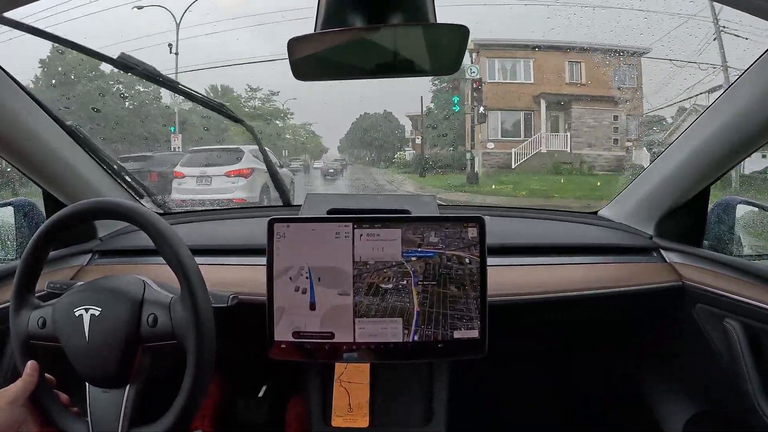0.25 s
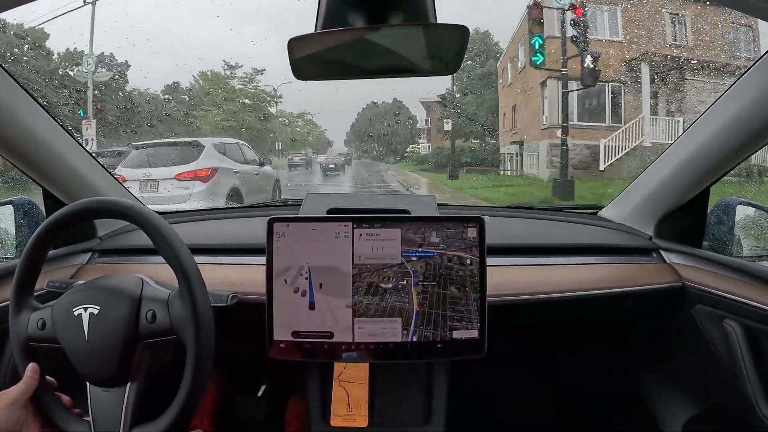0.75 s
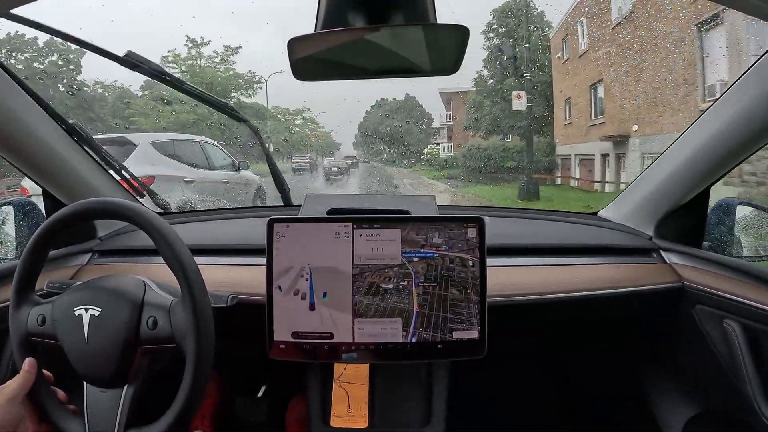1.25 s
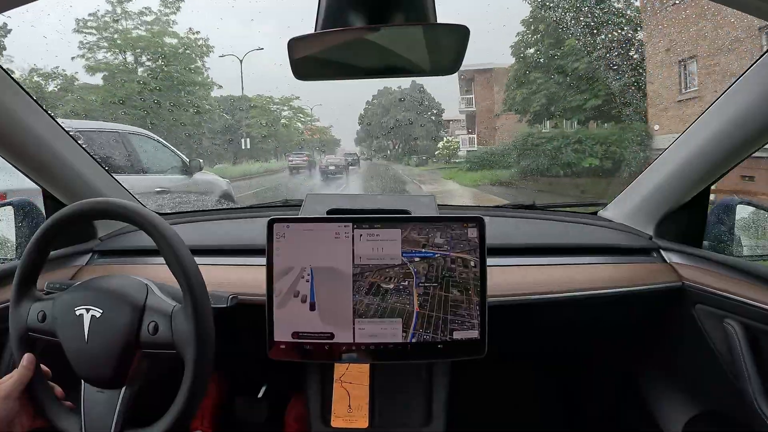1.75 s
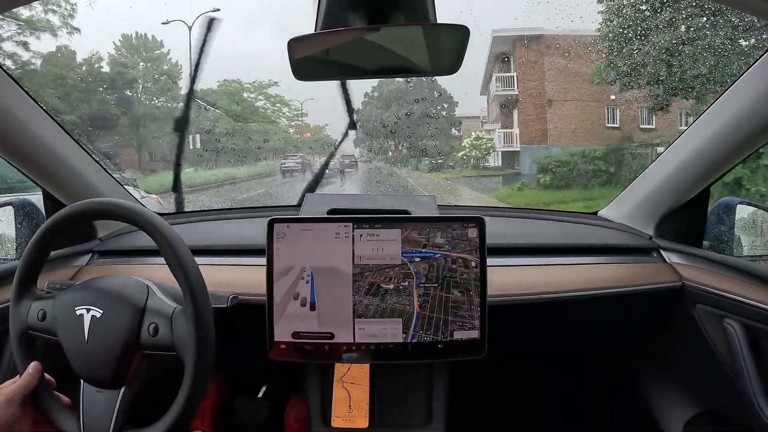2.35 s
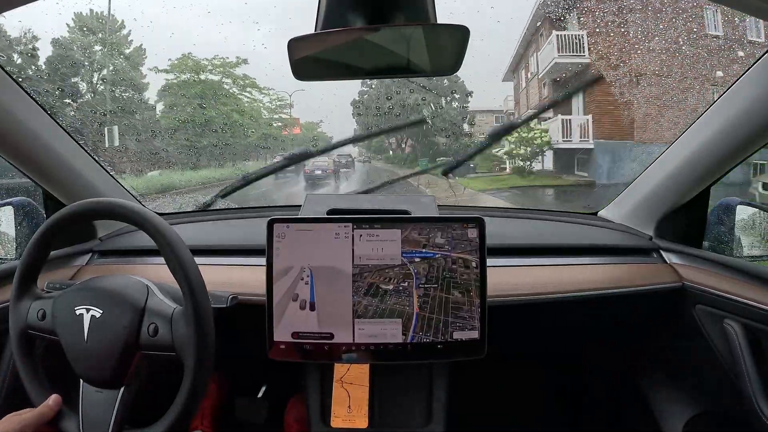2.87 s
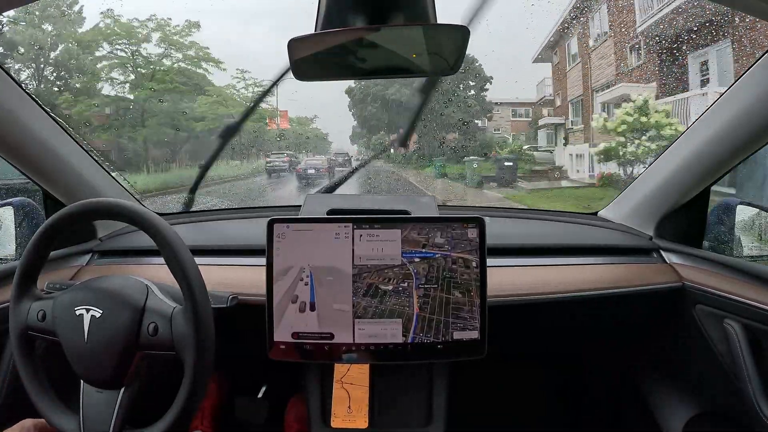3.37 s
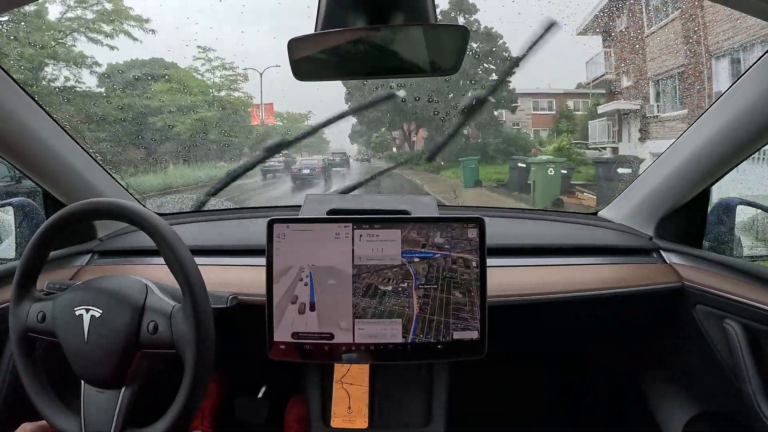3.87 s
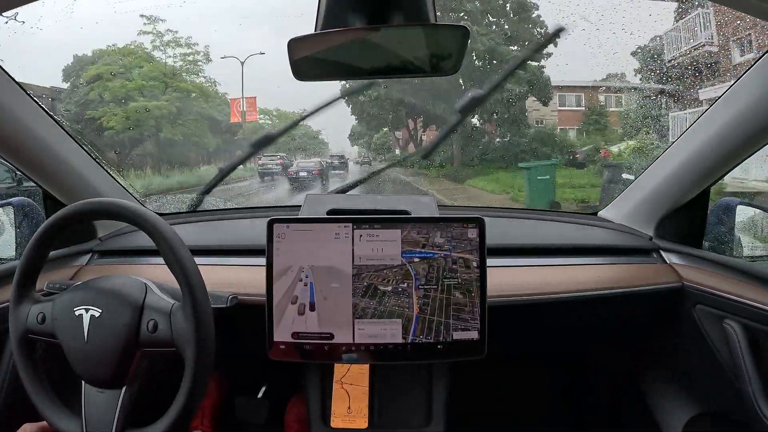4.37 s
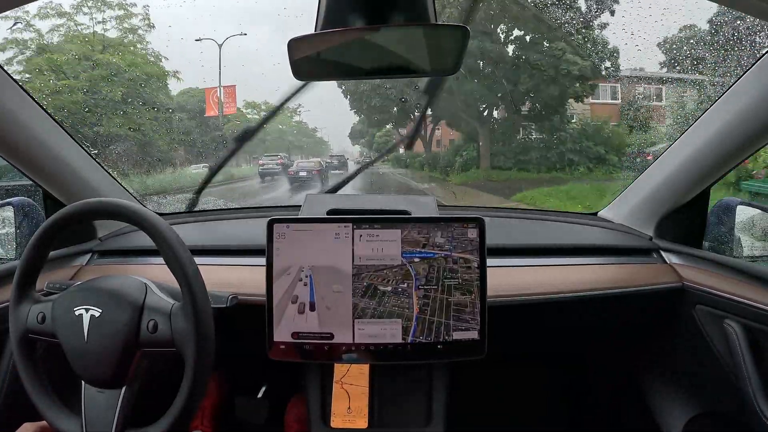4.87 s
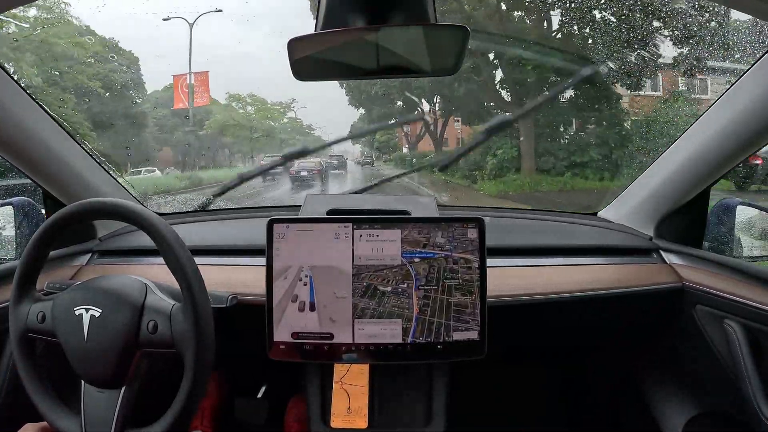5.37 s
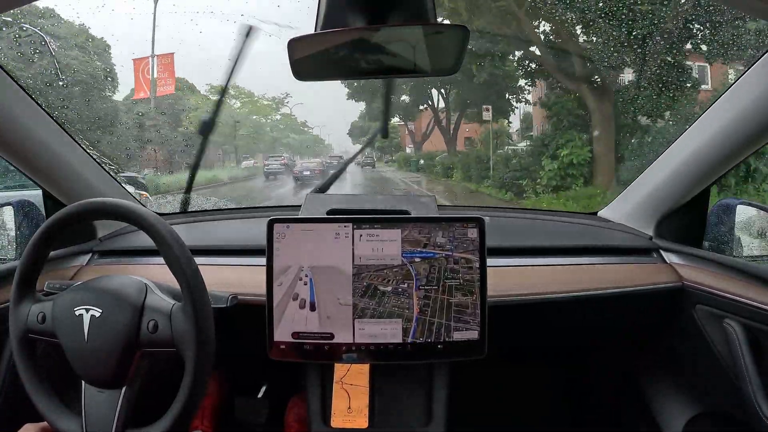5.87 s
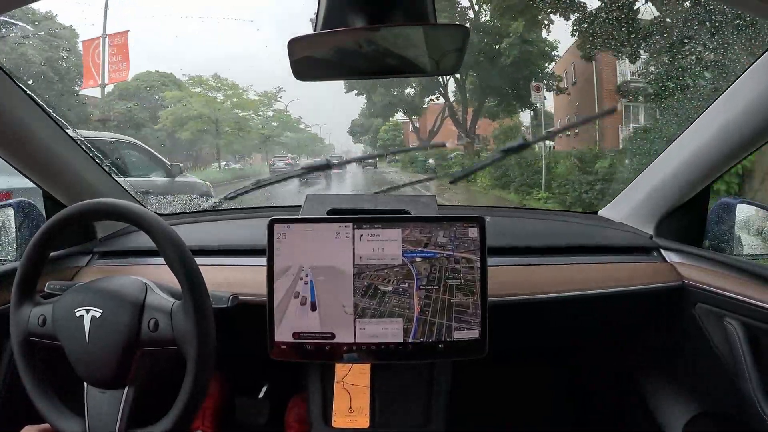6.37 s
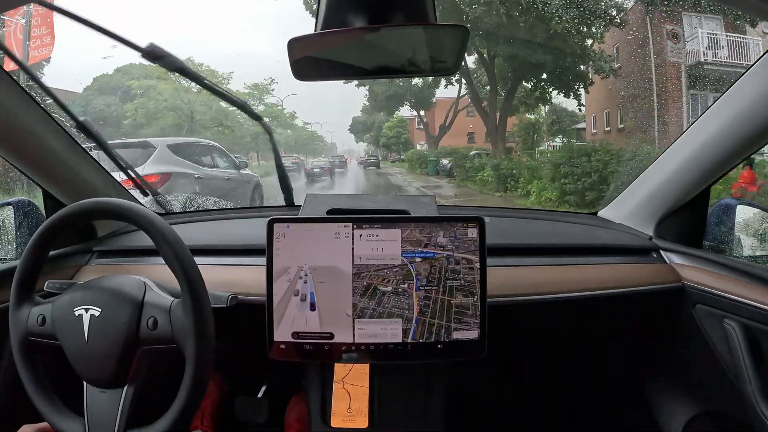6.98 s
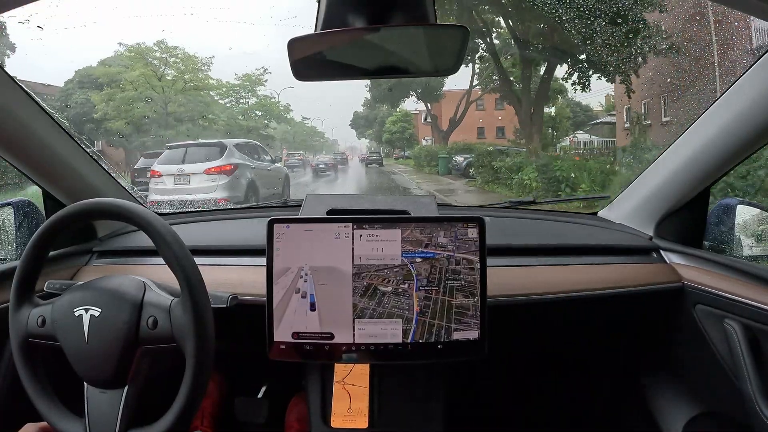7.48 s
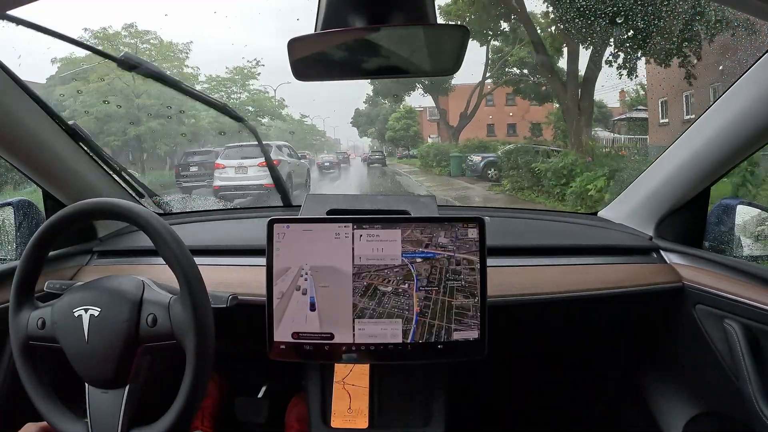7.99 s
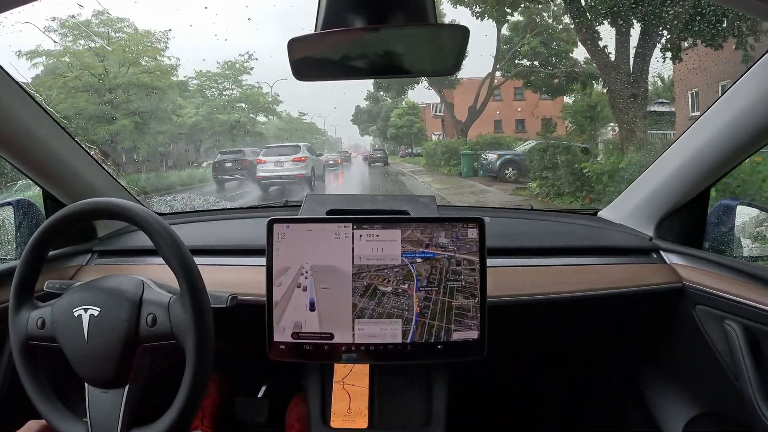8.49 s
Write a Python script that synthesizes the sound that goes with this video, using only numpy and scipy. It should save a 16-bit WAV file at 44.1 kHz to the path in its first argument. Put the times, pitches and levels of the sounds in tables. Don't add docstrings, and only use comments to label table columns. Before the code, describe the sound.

Heard from between the front seats of a car in a downpour. A very low, wavering boom and lumpy tyre rumble dominate, swelling over bumps. Steady wet-road spray and fine patter hiss above. Wipers knock dully about twice a second, while fat drops burst on the windshield, most densely a little after six seconds as trees pass overhead.

```python
import sys
import numpy as np
from scipy import signal
from scipy.fft import rfft, irfft, next_fast_len
from scipy.io import wavfile
from scipy.ndimage import uniform_filter1d

SR = 44100
rng = np.random.default_rng(int(sys.argv[2]) if len(sys.argv) > 2 else 0)


def digitize_waveform(pressure):
    field = np.atleast_2d(pressure).T
    bounded = np.clip(field, -1, 1)
    quanta = np.round(bounded * 32767).astype(np.int16)
    wavfile.write(sys.argv[1], SR, quanta)


def magnitude_from_level(level_db):
    exponent = np.asarray(level_db, float) / 20
    return 10 ** exponent


N = 385434
HZ = np.maximum(np.fft.rfftfreq(next_fast_len(N), 1 / SR), 1)

# frequency_hz, density_db (per Hz)
FLOOR_PAN = [(7.1, -34), (12, -30), (27, 16), (43, -8), (52, -0.5), (71, -14), (120, -18.5), (214, -27.5),
             (313, -29.5), (381, -36), (450, -59), (580, -71), (990, -120)]
# frequency_hz, density_db (per Hz)
GLASS = [(1180, -27), (2000, -1), (2260, 0), (5460, -3), (7580, -7.5), (8500, -20), (11000, -43),
         (18700, -120)]
# frequency_hz, density_db (per Hz)
FINE_DROPS = [(6000, -5), (7000, -2.5), (7700, -3), (8200, -6), (9600, -9), (10500, -16), (11200, -21),
              (12500, -23.5), (14000, -26), (15000, -40), (15800, -44), (17000, -58)]
# start_s, spray_db, brightness_db (of what reaches the glass)
RAIN = [(0, -49.5, 0), (1.05, -47, 0.7), (1.36, -47, -.4), (2.43, -49.5, 0), (3.05, -46.5, -0.5),
        (3.53, -47.5, -1.5), (3.95, -46, -1), (4.36, -44.5, -1.8), (4.7, -46.5, -3), (5.7, -46.5, -2),
        (6.25, -47, -3), (6.42, -50, -4), (6.67, -49.5, -5.5), (7.3, -51, -5), (7.4, -55, -6),
        (7.56, -52, -5.5), (7.9, -50, -3.5), (8.74, -48.5, -4.5)]


def rms_one(x):
    return x / np.sqrt(np.mean(x ** 2) + 1e-20)


def in_time(rows):
    s, *columns = np.transpose(rows)
    return [np.interp(np.arange(N) / SR, s, column) for column in columns]


def over_hz(points):
    hz, db = np.transpose(points)
    return np.interp(np.log(HZ), np.log(hz), db)


def band(low_hz, high_hz):
    return 1 / np.sqrt((1 + (low_hz / HZ) ** 12) * (1 + (HZ / high_hz) ** 12))


def drift(rate_hz):
    r = np.exp(-80 * np.pi * rate_hz / SR)
    noise = rng.standard_normal(N // 40 + 2002)
    slow = signal.lfilter([1], [1, -2 * r, r * r], noise)[2000:]
    return np.interp(np.arange(N) / 40, np.arange(len(slow)), rms_one(slow - slow.mean()))


def swells(rows, hz):
    t = np.arange(0, N + 40, 40) / SR
    bells = np.zeros(len(t))
    for crest_s, at_hz, level_db, half_s in rows:
        if abs(np.log(at_hz / hz)) < .14:
            bells += magnitude_from_level(level_db) * np.exp(-.5 * ((t - crest_s) / half_s) ** 2)
    return np.interp(np.arange(N) / SR, t, bells)


def wide(pair, gain):
    # frequency_hz, likeness (0-1)
    likeness = [(80, .999), (140, .96), (280, .9), (560, .8), (1300, .8), (2400, .56), (4500, .82),
                (8000, .88), (12000, .75)]
    # frequency_hz, tilt_db
    tilt = [(40, .9), (180, 1.4), (500, .8), (1500, .1), (4000, .5), (8000, -.5), (12000, .6)]
    mid, side = rfft(pair, next_fast_len(N)) * gain
    alike, lean = np.clip(over_hz(likeness), 0, 1), magnitude_from_level(over_hz(tilt) / 2)
    mid = mid * np.sqrt(1 + alike)
    side = side * np.sqrt(1 - alike)
    left_right = np.array([(mid + side) * lean, (mid - side) / lean])
    return rms_one(irfft(left_right, next_fast_len(N))[:, :N])


def boom():
    modes_hz = [23.65, 32.77, 41.13]
    # start_s, level_db
    shaking = [(0, -32.5), (.6, -24.5), (1, -24.5), (1.45, -31), (2.3, -29), (2.6, -30.5), (3.0, -28.5),
               (3.25, -30.5), (3.9, -28.5), (4.4, -26), (5.2, -32), (5.9, -25.5), (6.2, -28.5),
               (7.3, -25.5), (7.5, -30.5), (7.9, -30.5), (8.74, -28.5)]
    # crest_s, mode_hz, level_db, half_width_s
    heaves = [(0.03, 42, -20, 0.16), (.1, 32, -17, 0.044), (.12, 24, -21, 0.26), (1.06, 24, -28, 0.11),
              (1.2, 32, -25, 0.071), (1.25, 42, -11.5, 0.065), (1.58, 24, -23, 0.06),
              (1.58, 32, -16.5, 0.042), (1.9, 24, -21, 0.073), (1.88, 42, -15, .08), (1.95, 32, -16.5, .09),
              (2.07, 42, -19.5, 0.051), (2.14, 32, -13, 0.057), (2.22, 42, -18, 0.088),
              (2.38, 32, -22.5, .08), (3.03, 40, -18.5, 0.057), (3.34, 42, -14.5, 0.056),
              (3.75, 32, -22, 0.025), (4.58, 32, -17.5, 0.063), (4.94, 42, -18.5, 0.11),
              (5.47, 42, -22.5, 0.17), (5.74, 32, -22, 0.06), (6.28, 32, -11, 0.05),
              (6.38, 42, -20.5, 0.13), (6.52, 24, -13.5, 0.043), (6.79, 24, -22, 0.065),
              (6.8, 32, -16.5, 0.15), (7.22, 32, -24, 0.052), (7.22, 42, -15, 0.042),
              (8.34, 42, -24, 0.074)]
    shake_db, = in_time(shaking)
    levels = []
    for mode_db, hz in zip([0, 0.8, .1], modes_hz):
        steady = magnitude_from_level(shake_db + mode_db - 0.5 + drift(2.8))
        levels.append(steady + 0.56 * swells(heaves, hz))
    modes = 0
    for level, hz in zip(levels, modes_hz):
        phase = 2 * np.pi * np.cumsum(hz + 2.2 * drift(3.8)) / SR
        modes = modes - np.sqrt(2) * level * np.cos(phase)
    bed = wide(rng.standard_normal((2, N)), magnitude_from_level(over_hz(FLOOR_PAN)) * band(8, 88))
    bed_level = np.prod(levels, axis=0) ** (1 / 3) * magnitude_from_level(-8.5)
    return modes * magnitude_from_level([[.45], [-.45]]) + bed_level * bed


def road():
    # start_s, level_db
    tarmac = [(0, -37.5), (.35, -39.5), (.6, -42), (1.4, -35), (2.0, -38.5), (2.7, -40.5), (2.9, -35.5),
              (3.3, -37), (3.8, -35.5), (4.1, -41), (4.4, -30.5), (4.62, -37), (5.3, -34), (6.6, -31.5),
              (7.1, -38.5), (7.4, -39), (8.35, -38), (8.74, -30)]
    # low_hz, high_hz, level_db (over the coarseness), road_share, rain_share (of their swings)
    pan_ranges = [
        (53, 83, -2, .4, .05),
        (82.5, 172.4, 1.85, 0.83, .05),
        (185.6, 394, -8.5, 0.26, 0.69),
    ]
    # crest_s, centre_hz, level_db, half_width_s
    jolts = [(0.01, 120, -30, 0.084), (.14, 65, -19.5, 0.068), (.44, 65, -26, 0.019),
             (.45, 120, -28.5, 0.019), (1.04, 65, -37, .06), (1.05, 120, -29, 0.018),
             (1.44, 65, -42, 0.067), (1.63, 65, -28, .03), (1.63, 120, -41, 0.025), (1.75, 65, -16, 0.037),
             (1.8, 120, -41, 0.036), (2.05, 120, -39, .03), (4.0, 260, -49.5, 1.03), (2.73, 65, -29, 0.047),
             (3.1, 65, -39, .08), (3.4, 65, -23, 0.047), (3.41, 120, -34, 0.033), (3.86, 65, -45, .05),
             (3.87, 120, -34, 0.027), (4.5, 120, -36, 0.023), (4.68, 120, -41, 0.035), (5.4, 65, -37, 0.18),
             (6.65, 65, -35, .15), (6.99, 120, -33.5, 0.077), (7.0, 65, -26.5, .12), (7.81, 65, -40, .1),
             (7.81, 120, -37, 0.15), (8.25, 120, -35, .04), (8.32, 65, -31, .03), (8.5, 120, -50, 0.036)]
    coarse_db, = in_time(tarmac)
    wet_db = in_time(RAIN)[0]
    mean_db = coarse_db.mean()
    coarse_swing_db, wet_swing_db = coarse_db - mean_db, wet_db - wet_db.mean()
    colour = magnitude_from_level(over_hz(FLOOR_PAN))
    out = 0
    for (low_hz, high_hz, db, road_share, rain_share), jolt_hz in zip(pan_ranges, [65, 120, 260]):
        shake = wide(rng.standard_normal((2, N)), colour * band(low_hz, high_hz))
        shake = shake / np.sqrt(uniform_filter1d(np.mean(shake ** 2, axis=0), size=SR // 8))
        level_db = mean_db + db + road_share * coarse_swing_db + rain_share * wet_swing_db
        level_db = level_db + 0.92 * drift(9.6)
        out = out + (magnitude_from_level(level_db) + 0.69 * swells(jolts, jolt_hz)) * shake
    return out


def patter(per_s, spread_db, t60):
    sizes = magnitude_from_level(spread_db * np.minimum(rng.exponential(1, N), 4))
    drops = (rng.random(N) < per_s / SR) * sizes
    return np.sqrt(signal.lfilter([1], [1, -magnitude_from_level(-120 / (t60 * SR))], drops ** 2 + 1e-12))


def water():
    # frequency_hz, density_db (per Hz)
    spray_spectrum = [(240, -20), (400, 0.5), (516, -2.5), (632, -6.5), (1150, -5.5), (2400, -10.5),
                      (3120, -32), (5280, -120)]
    spray_db, bright_db = in_time(RAIN)
    pane_db, hiss_db, fine_db = -4.5 - 0.11 * bright_db, -6 + bright_db, -14 + 1.17 * bright_db
    gust_db = 1.16 * np.tanh(0.74 * drift(13.0)) + 0.14 * drift(30)
    grains = rms_one(patter(per_s=900., spread_db=2.0, t60=0.042))
    ticks = rms_one(patter(per_s=110.0, spread_db=-1.5, t60=0.005))
    white = rng.standard_normal((3, 2, N))
    spray = wide(white[0] * (0.58 + 0.36 * grains), magnitude_from_level(over_hz(spray_spectrum)) * band(404, 2210))
    drops = white[1] * (.5 + 0.34 * grains + 0.069 * ticks)
    glass, fine_colour = magnitude_from_level(over_hz(GLASS)), magnitude_from_level(over_hz(FINE_DROPS))
    pane = wide(drops, glass * band(2320, 3980))
    hiss = wide(drops, glass * band(4890, 8400))
    fine = wide(white[2] * (0.42 + .45 * grains + .15 * ticks), fine_colour * band(7760, 16500))
    layers = magnitude_from_level(1.5 + 0.46 * gust_db + 0.16 * drift(1.6)) * spray
    layers += magnitude_from_level(pane_db + 0.55 * gust_db) * pane
    layers += magnitude_from_level(hiss_db + 1.5 * gust_db) * hiss
    layers += magnitude_from_level(fine_db + 1.5 * gust_db) * fine
    return magnitude_from_level(spray_db) * layers


def drips():
    start_s, end_s = 6.4, 7.4
    place, size, body = rng.random((28, 3)).T
    place = (np.arange(len(place)) + place) / len(place)
    peak_db = -38.5 - 3 * place ** 2 + 5 * (2 * size - 1)
    body_db = -4.5 + 9 * (body - .5)
    return list(zip(start_s + place * (end_s - start_s), peak_db, body_db))


def splats():
    # start_s, peak_db, body_db
    fat_drops = [(1.0714, -29.5, -4.5), (1.1794, -31, -11), (1.2924, -34, -4), (2.7472, -33, -12),
                 (2.813, -35, -9), (3.0988, -36, -8), (4.5863, -30.5, -8), (5.2455, -33.5, -13),
                 (5.6288, -33.5, -1), (6.279, -33.5, -2), (6.463, -30, -4), (6.5474, -41, -7),
                 (6.556, -31, -9), (6.6138, -33.5, -3), (6.6427, -34, -15), (6.6664, -29, -6),
                 (6.6824, -36, -8), (6.7, -39, -2), (6.7151, -46, 2), (6.7847, -42, -10), (6.8612, -28, -4),
                 (6.9311, -40, -3), (6.9944, -33, -1), (7.069, -37, -2), (7.1398, -33, -6),
                 (7.1767, -37, 1), (7.2207, -38, -3), (7.6355, -39, -7), (8.0694, -34.5, -12),
                 (8.706, -32, 1)]
    white = rng.standard_normal((2, 2, N))
    hiss_db = np.maximum(over_hz(GLASS), over_hz(FINE_DROPS) - 7) + 0.96 * np.log2(HZ / 4000)
    hiss = wide(white[0], magnitude_from_level(hiss_db) * band(2550, 16500))
    body = wide(white[1], band(800, 2280))
    out, t = np.zeros((2, N)), np.arange(SR // 8) / SR
    landing = 1 - np.exp(-t / .00025)
    tick = 1.1 * magnitude_from_level(-60 * t / .01)
    envelope = landing * (tick + magnitude_from_level(-60 * t / 0.085))
    rows = drips() + list(fat_drops)
    for (s, db, body_db), pan_db in zip(rows, rng.normal(.6, 1.2, len(rows))):
        at = round((s + .0006) * SR)
        shape = magnitude_from_level(db - 15.5) * envelope
        burst = (hiss + magnitude_from_level(body_db + 4.0) * body)[:, at:at + len(t)]
        out[:, at:at + len(t)] += shape[:N - at] * burst * magnitude_from_level([[pan_db / 2], [-pan_db / 2]])
    return out


def wipers():
    # start_s, thump_db (peak), thump_hz, rap_db
    turns = [(0.45, -38.5, 288, -45), (.959, -41, 281, -43), (1.416, -30.5, 273, -52),
             (1.531, -28, 223, -46.5), (2.39, -29.5, 226, -63), (2.895, -33, 318, -47),
             (3.366, -30, 252, -45), (3.804, -30.5, 267, -49), (4.335, -20.5, 255, -46),
             (4.78, -30.5, 242, -42), (5.315, -23.5, 262, -42.5), (5.432, -29.5, 202, -52),
             (5.74, -29, 291, -44), (6.285, -25.5, 268, -44), (6.659, -31, 228, -45),
             (6.955, -37, 296, -53), (7.26, -30.5, 256, -47), (7.688, -30, 283, -46), (8.22, -22, 247, -48),
             (8.672, -29, 269, -38.5)]
    arm_modes = [(.7, 0.19), (1, 1), (1.45, 1), (1.9, 1)]
    out, t = np.zeros(N + SR), np.arange(SR // 3) / SR
    arm = sum(share * np.sin(2 * np.pi * ratio * 509 * t) for ratio, share in arm_modes)
    cowl = 1.56 * np.sin(2 * np.pi * 125 * t)
    for s, thump_db, thump_hz, rap_db in turns:
        swell = (1 - np.exp(-t / 0.0067)) * magnitude_from_level(thump_db + 2.5 - 60 * t / 0.11)
        rubber = np.sin(2 * np.pi * thump_hz * t) + 0.38 * np.sin(2 * np.pi * 1.3 * thump_hz * t)
        rap = (1 - np.exp(-t / 0.002)) * magnitude_from_level(rap_db + 5.0 - 60 * t / 0.049) * arm
        at = round(s * SR)
        out[at:at + len(t)] += swell * (rubber + cowl)
        out[at - 130:at - 130 + len(t)] += rap
    return out[:N] * magnitude_from_level([[.7], [-.7]])


def ring(clicks, hz, t60):
    r, w = magnitude_from_level(-60 / (t60 * SR)), 2 * np.pi * hz / SR
    return signal.lfilter([0, np.sin(w)], [1, -2 * r * np.cos(w), r * r], clicks + 1e-18)


def ping():
    # start_s, peak_db, pitch_hz
    trim_drop = [
        (8.7234, -33.5, 1800),
    ]
    s, db, hz = trim_drop[0]
    click = (np.arange(N) == round(s * SR)) * magnitude_from_level(db + 4.0)
    return ring(click, hz, t60=0.025)


def scene():
    return boom() + road() + water() + wipers() + ping() + splats()


def low_pass(x):
    return signal.sosfilt(signal.butter(12, 15720, fs=SR, output="sos"), x)


def record(dry):
    mix = .5 * np.tanh(dry / .5)
    return low_pass(mix)


dry = scene()
out = record(dry)
digitize_waveform(out)
```